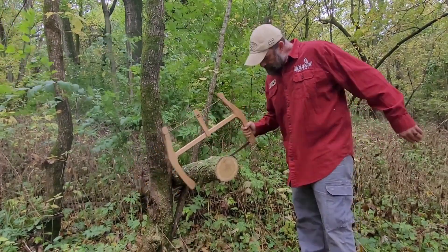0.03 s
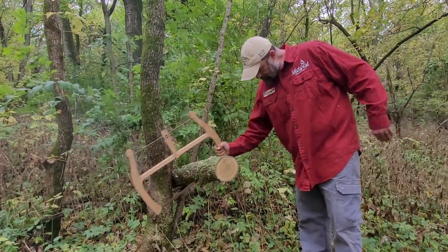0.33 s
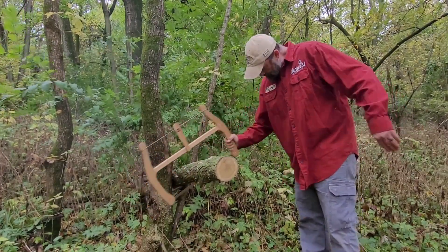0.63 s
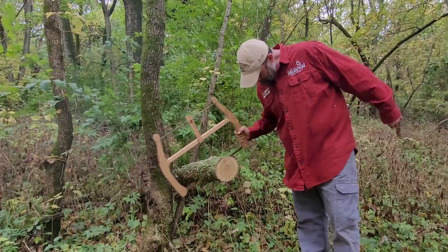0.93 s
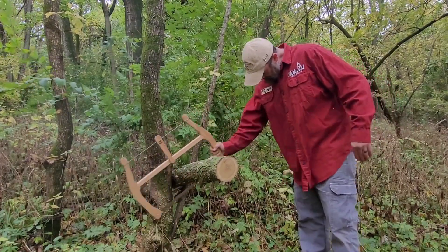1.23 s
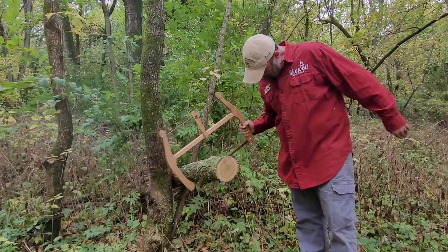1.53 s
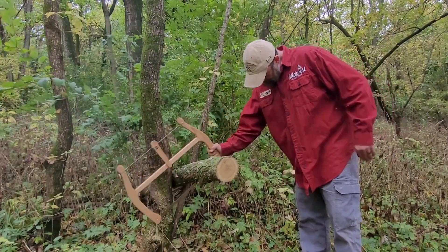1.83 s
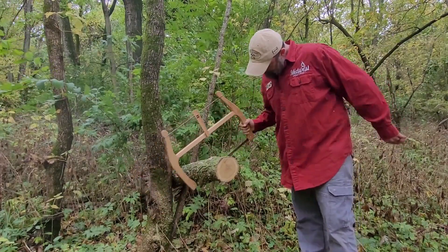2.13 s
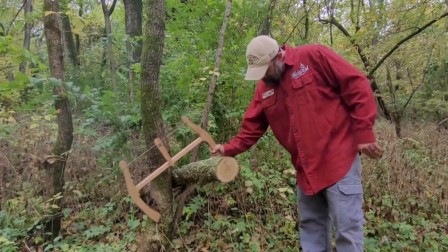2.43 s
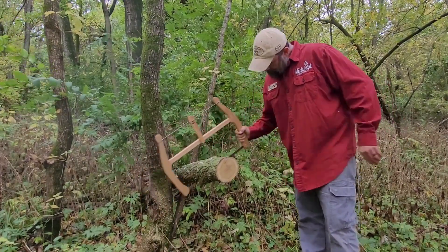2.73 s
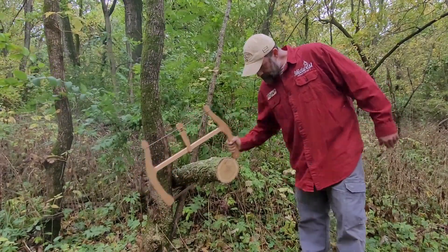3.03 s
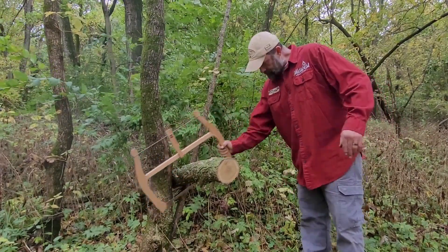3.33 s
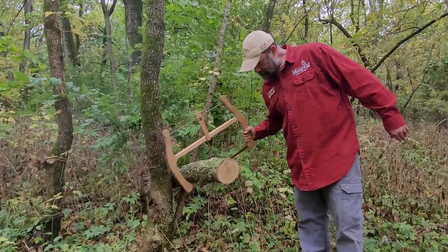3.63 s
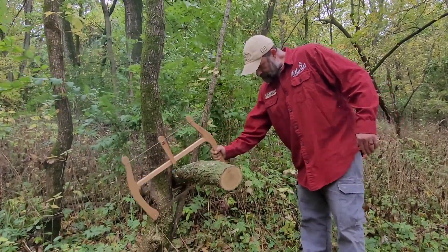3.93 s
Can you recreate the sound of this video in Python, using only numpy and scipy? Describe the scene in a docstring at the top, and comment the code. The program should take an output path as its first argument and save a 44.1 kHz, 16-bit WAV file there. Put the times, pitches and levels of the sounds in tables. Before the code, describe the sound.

A hand saw rasps through a small log throughout, with six hard pushes about 0.7 seconds apart, from 0.4 to 3.8 seconds, and lighter, juddering pulls between them. The steel blade rings faintly and chirps on some strokes, with slight knocks from the log. Air bumps softly on the microphone in the first second and its rumble fades by 2 seconds, leaving a low woodland hush behind the sawing.

```python
"""A rasping wooden bucksaw is pulled and pushed through a small log in a quiet wood.
Its teeth tick over the kerf and tear fibres, forcing the resonances of log and steel blade;
pushes bite hard, pulls are lighter and judder. Friction makes the blade sing and chirp,
and the trees scatter a faint tail. Air rumbles on the microphone, bumping in the first second."""
import sys
import numpy as np
from scipy import signal
from scipy.fft import rfft, irfft
from scipy.io import wavfile
from scipy.ndimage import uniform_filter1d

SR = 44100
rng = np.random.default_rng(int(sys.argv[2]) if len(sys.argv) > 2 else 0)


def transcribe(u):
    """Save the signal u as a 16-bit wav file named by the first command-line argument.

    u: samples, shape (n,) or (channels, n), limited to [-1, 1]; the rate is SR.
    q: integer samples, one column per channel.
    """
    v = np.clip(np.atleast_2d(u).T, -1, 1)
    q = np.round(v * 32767).astype(np.int16)
    wavfile.write(sys.argv[1], SR, q)


N = 176400
T, HZ = np.arange(N) / SR, np.maximum(np.arange(N + 1) * SR / (2 * N), 1)
BITE_RISE_S, CUTOFF_HZ = 0.0053, 15850

# Saw strokes. Each row: start, fastest moment and end in seconds, force in dB, singing gain in dB.
PUSHES = [(0.189, 0.385, 0.46, -33.5, 2), (0.915, 1.089, 1.172, -33.5, -0.5), (1.618, 1.744, 1.834, -33, 1),
          (2.266, 2.41, 2.512, -33.5, -4), (2.96, 3.113, 3.215, -33, -2), (3.652, 3.802, 3.905, -33.5, -10)]
PULLS = [(-.15, 0.014, .13, -38, -4), (0.557, 0.731, 0.86, -38.5, -10), (1.259, 1.419, 1.556, -39, -13),
         (1.925, 2.069, 2.174, -39.5, -15), (2.564, 2.782, 2.885, -41.5, -21),
         (3.275, 3.49, 3.587, -38, -17)]
# The saw's stereo balance. Each row: frequency in Hz, left minus right in dB.
SAW_BALANCE = [(300, -2), (2300, 1), (3550, -5.5), (4200, -2.5), (5100, 6.5), (6600, -2.5), (8000, 0.5),
               (13000, 2), (15500, 9)]
# Its coherence. Each row: frequency in Hz, left-right correlation.
SAW_COHERENCE = [(300, 1), (1200, 0.48), (2900, 0.65), (3400, -0.33), (6400, -0.075), (8000, 0.84),
                 (13000, 0.82), (15000, .3)]


def amp(db):
    """Decibels to amplitude ratio."""
    return 10 ** (np.asarray(db) / 20)


def unit(x):
    """Normalisation to rms 1."""
    return x / np.sqrt(np.mean(x ** 2) + 1e-20)


def curve(points):
    """Interpolation over log frequency."""
    hz, value = np.transpose(points)
    return np.interp(np.log(HZ), np.log(hz), value)


def shaped(x, response):
    """Linear filtering: spectrum times frequency response."""
    return irfft(rfft(x, 2 * N) * response)[..., :N]


def causal(gain):
    """Minimum-phase response: it rings only after a blow."""
    cepstrum = irfft(np.log(gain))
    cepstrum[1:N] *= 2
    cepstrum[N + 1:] = 0
    return np.exp(rfft(cepstrum))


def drift(hz):
    """Random fluctuation: low-passed noise of rms 1."""
    return unit(shaped(rng.standard_normal(N), 1 / (1 + (HZ / hz) ** 2)))


def stereo(mid, side, coherence, pan_db):
    """Partial coherence: sum and difference of independent signals give left and right."""
    coherence = np.clip(coherence, -.99, .99)
    common = shaped(mid, np.sqrt((1 + coherence) / 2))
    opposed = shaped(side, np.sqrt((1 - coherence) / 2))
    left = amp(pan_db)
    norm = np.sqrt(2 / (1 + left ** 2))
    return np.array([shaped(common + opposed, left * norm), shaped(common - opposed, norm)])


def noise(spectrum, coherence, pan_db):
    """Coloured stereo noise of rms 1."""
    white = stereo(*rng.standard_normal((2, N)), coherence, pan_db)
    return unit(shaped(white, amp(curve(spectrum))))


def arm():
    """Reciprocating drive: blade speed and cutting force, with strokes and catches adding in power."""
    # Brief bites of the blade. Each row: time in seconds, force in dB.
    catches = [(0.231, -38.5), (.382, -45), (.598, -38), (.655, -37), (0.707, -39.5), (.975, -40.5),
               (1.303, -42), (1.661, -38), (1.971, -37), (2.032, -38), (2.105, -39), (2.642, -36),
               (2.707, -34.5), (2.756, -36.5), (2.797, -38), (2.988, -37), (3.04, -35), (3.348, -39),
               (3.468, -40), (3.518, -42)]
    # The teeth skip between bites. Each entry: time in seconds.
    skips = [.636, 1.345, 2.005, 2.68, 3.012, 3.392]
    catch_fall_s, skip_db, skip_s = 0.012, -5, 0.013
    speed, power = np.zeros(N), np.zeros(N)
    for strokes, force_exponent in ((PUSHES, 0.93), (PULLS, 0.89)):
        for start, fastest, end, db, _ in strokes:
            swing = np.abs(np.sin(np.pi * np.interp(T, [start, fastest, end], [0, .5, 1])))
            speed = np.maximum(speed, swing)
            power += (amp(db) * swing ** force_exponent) ** 2
    for s, db in catches:
        power += amp(db) ** 2 * np.exp(-((T - s) / np.where(T < s, BITE_RISE_S, catch_fall_s)) ** 2)
    power *= amp(skip_db * sum(np.exp(-((T - s) / skip_s) ** 2) for s in skips)) ** 2
    # Light rubbing eases each stroke in and out.
    rubbing = amp(-8) ** 2 * np.abs(uniform_filter1d(power, int(0.12 * SR) + 1))
    return speed, np.sqrt(power + rubbing)


def chips(speed):
    """Relaxation oscillation: the force jumps as each chip breaks away, then sags until the next."""
    rate_hz, spread_db, sag_db = 90.4, 1.1, 3.5
    cycle = np.cumsum(rate_hz * np.sqrt(speed) * np.exp(.5 * drift(rate_hz))) / SR
    chip_db = spread_db * rng.standard_normal(N)[cycle.astype(int)]
    return unit(amp(chip_db - sag_db * (cycle % 1)))


def teeth(speed):
    """Impulse train: each passing tooth gives a dull tick. Returns the running count and the ticks."""
    full_speed_hz, jitter, spread_db, dull_hz = 322.1, .07, 0.6, 740
    count = np.cumsum(full_speed_hz * speed ** .3 * (1 + jitter * drift(80))) / SR
    impulses = np.diff(np.floor(count), prepend=0) * amp(spread_db * rng.standard_normal(N))
    band_pass = 1j * HZ / (200 + 1j * HZ) / (1 + 1j * HZ / dull_hz)
    return count, unit(shaped(impulses, band_pass))


def tearing(speed, tooth_count):
    """Shot noise of snapping fibres and hiss of friction, both pulsing slightly with each tooth."""
    fibres_per_s = 7000
    pulsing = np.exp(0.14 * np.cos(2 * np.pi * tooth_count))
    snaps = (rng.random(N) < fibres_per_s * (speed + .1) / SR) * rng.choice([-1, 1], N)
    return amp(-6.5) * unit(snaps * pulsing) + amp(-1) * unit(rng.standard_normal(N) * pulsing)


def flaring(x):
    """Random amplitude modulation: each of 26 overlapping bands swells and fades by itself."""
    spread_db, flare_hz = 2.55, 21.96
    place = np.log1p(HZ[::2] / 1500) * 10
    spectrum, out = rfft(x), 0
    for k in range(26):
        band = irfft(spectrum * np.maximum(1 - np.abs(place - k), 0))
        gains = amp(spread_db * rng.standard_normal(1000))
        out = out + band * np.interp(T * 2 * flare_hz, np.arange(len(gains)), gains)
    return out


def body_response():
    """Modal response of log, frame and blade, rippled by a crowd of weak, narrow modes."""
    # Broad colour. Each row: frequency in Hz, relative spectral level in dB.
    colour = [(40, 6), (160, -3), (280, 9.5), (500, 3), (2700, 0), (6200, 1.5), (8400, -1.5), (12200, -7),
              (13800, 2), (15600, 4.5)]
    # Main resonances. Each row: centre and width in Hz, lift in dB.
    modes = [(356, 96, 4.5), (625, 75, 3), (767, 146, 6.5), (1193, 140, 6.5), (2135, 890, 4),
             (3597, 830, 12.5), (4188, 237, 9), (5120, 980, 8), (7084, 390, 8), (7740, 500, 6),
             (8850, 99, 8), (10940, 1320, 9.5), (12740, 500, 11.5)]
    ripple_db, ripple_width_hz, ripple_from_hz = 2, 70, 850
    peaks_db = sum(db / (1 + (2 * (HZ - hz) / width) ** 2) for hz, width, db in modes)
    ripple = unit(uniform_filter1d(rng.standard_normal(N + 1), int(ripple_width_hz * 2 * N / SR)))
    gain = amp(curve(colour) + peaks_db + ripple_db * ripple * (HZ > ripple_from_hz))
    return causal(gain / np.sqrt(np.mean(gain ** 2 * (HZ < CUTOFF_HZ))))


def narrow(hz, half_width):
    """Friction noise filtered by one resonance, rms 1."""
    return unit(shaped(rng.standard_normal(N), 1 / (1 + 1j * (HZ - hz) / half_width) ** 2))


def singing(force):
    """Friction excites the steel's modes, which follow the load with a short lag."""
    # Blade modes. Each row: centre and half-width in Hz, gain in dB, load exponent, lag in seconds.
    modes = [(3495, 130, -39, 1.03, 0.0072), (4060, 140, -41, 0.91, 0.0023)]
    load = np.maximum(uniform_filter1d(force, int(0.0095 * SR) + 1), 1e-9)
    load /= load.max()
    ring = 0
    for hz, half_width, db, exponent, lag in modes:
        drive = amp(db) * np.interp(T - lag, T, load) ** exponent
        ring = ring + drive * np.array([narrow(hz, half_width), narrow(hz, half_width)])
    ring = stereo(*ring, curve(SAW_COHERENCE), curve(SAW_BALANCE))
    stroke_gains = sorted((s, db) for start, _, end, _, db in PUSHES + PULLS for s in (start, end))
    return amp(np.interp(T, *np.transpose(stroke_gains))) * (ring + whistle(load))


def saw():
    """Forced vibration: ticks and tearing drive log and saw while the blade sings."""
    speed, force = arm()
    force = force * chips(speed)
    tooth_count, ticks = teeth(speed)
    mid = tearing(speed, tooth_count) + amp(-15.5) * ticks
    side = tearing(speed, tooth_count)
    rasp = flaring(force * np.array([mid, side]))
    rasp = stereo(*rasp, curve(SAW_COHERENCE), curve(SAW_BALANCE))
    return shaped(rasp, body_response()) + singing(force)


def forest_air():
    """Ambient noise: the steady, low hush of still air."""
    # Each row: frequency in Hz, relative spectral level in dB.
    spectrum = [(25, -8), (70, 6.5), (130, -2.5), (300, -3.5), (1200, -17), (9000, -27.5), (15000, -47)]
    return amp(-47.5) * noise(spectrum, coherence=0.67, pan_db=-1.0)


def rumble():
    """Pressure fluctuations: air buffets the microphone and dies away; bumps are damped sinusoids."""
    # Buffeting envelope. Each row: time in seconds, level in dB.
    envelope = [(0, -34.5), (.25, -33), (.5, -37.5), (.95, -38), (1.2, -47.5), (1.75, -42), (2.05, -62.5)]
    # Its colour. Each row: frequency in Hz, relative spectral level in dB.
    spectrum = [(22, -26), (48, 1), (70, 3.5), (90, -13), (115, -4.5), (170, -19), (1000, -50)]
    # Soft bumps. Each row: start in seconds, initial envelope in dB, pitch in Hz.
    bumps = [(0.017, -23, 175), (0.153, -20, 149), (0.63, -22, 80.6), (.79, -22.5, 72.7),
             (0.954, -25.5, 83)]
    decay_cycles = 0.62
    out = amp(np.interp(T, *np.transpose(envelope))) * noise(spectrum, coherence=0.08, pan_db=-4)
    for s, db, hz in bumps:
        cycles = np.maximum(T - s, 0) * hz
        out += amp(db) * np.sin(2 * np.pi * cycles) * np.exp(-cycles / decay_cycles)
    return out


def woods(x):
    """Diffuse scattering from trunks and ground adds a faint, exponentially decaying tail."""
    # Each row: frequency in Hz, gain of the scattered sound in dB.
    scatter = [(200, -7), (3000, -15.5), (15000, -54)]
    t60_s, delay_s = 0.98, 0.02
    tail = rng.standard_normal((2, N)) * amp(-60 * T / t60_s) * (T > delay_s)
    return shaped(x, rfft(unit(tail) / np.sqrt(N), 2 * N) * amp(curve(scatter)))


def whistle(load):
    """Friction noise in a gliding resonance: it swells and falls in pitch as the blade goes in."""
    lowest_hz, glide_hz, lag_s, carrier_hz = 12535, 700, 0.0073, SR / 4
    stops = [(s, at) for start, _, end, _, _ in PUSHES for s, at in ((start, 0), (end, 1))]
    reach = np.sin(np.pi / 2 * np.interp(T, *np.transpose(stops))) ** 2
    drive = np.interp(T - lag_s, T, load) * reach ** 2
    hz = lowest_hz + glide_hz * (1 - reach) ** 2
    band = signal.hilbert(narrow(carrier_hz, half_width=61))
    shift = np.exp(2j * np.pi * np.cumsum(hz - carrier_hz) / SR)
    return amp(-41.5) * drive * np.real(band * shift)


def burst(s, db, hz, waver_hz):
    """Damped oscillation: a wavering note swells quickly and rings out."""
    decay_s = 0.017
    envelope = np.exp(-np.where(T < s, ((T - s) / BITE_RISE_S) ** 2, (T - s) / decay_s).clip(0, 20))
    waver = np.interp(T, np.linspace(0, T[-1], 1000), rng.standard_normal(1000))
    return amp(db) * envelope * np.sin(2 * np.pi * np.cumsum(hz + waver_hz * waver) / SR)


def binding():
    """Transient excitation: where the teeth bind, the log knocks and the blade chirps."""
    # Jolts of the log. Each row: time in seconds, level of each mode in dB.
    jolts = [(0.284, -41.5), (1.69, -41), (1.976, -39), (2.38, -40), (3.351, -43), (3.78, -37.5)]
    # Blade chirps. Each row: time in seconds, pitch in Hz, level on the right in dB.
    chirps = [(0.382, 4075, -27.5), (.708, 3500, -37), (1.125, 3462, -32), (1.308, 3480, -38),
              (1.792, 3434, -34.5), (2.452, 3452, -37), (3.04, 3545, -35)]
    log_modes_hz, left_db = (287.2, 378), -2
    log = sum(burst(s, db, hz, waver_hz=34.75) for s, db in jolts for hz in log_modes_hz)
    blade = sum(burst(s, db, hz, waver_hz=69.5) for s, hz, db in chirps)
    return log + np.array([amp(left_db) * blade, blade])


def scene():
    """Superposition of the saw, its scatter among the trees, still air and rumble."""
    cut = saw() + binding()
    return cut + woods(cut) + forest_air() + rumble()


def record(dry):
    """A steep low-pass filter removes the highest treble."""
    return shaped(dry, 1 / np.sqrt(1 + (HZ / CUTOFF_HZ) ** 300))


dry = scene()
out = record(dry)
transcribe(out)
```